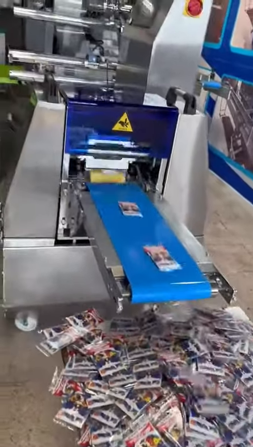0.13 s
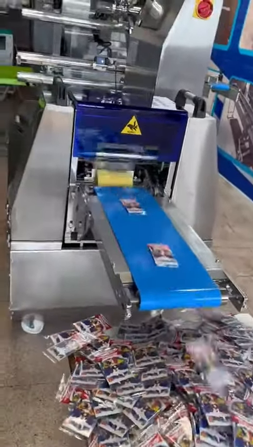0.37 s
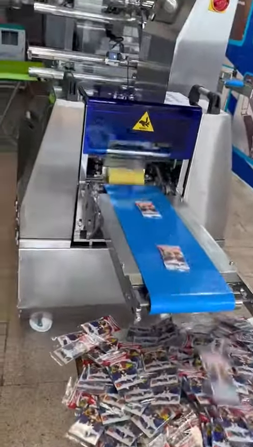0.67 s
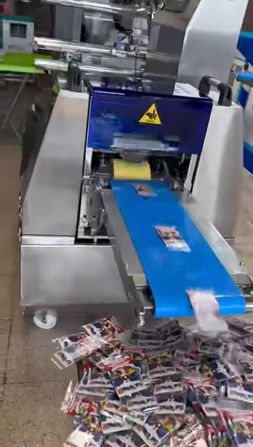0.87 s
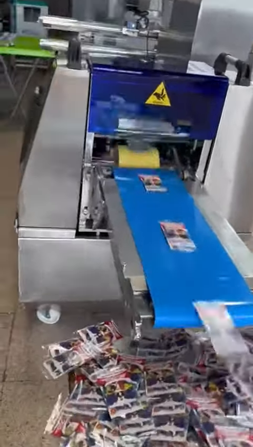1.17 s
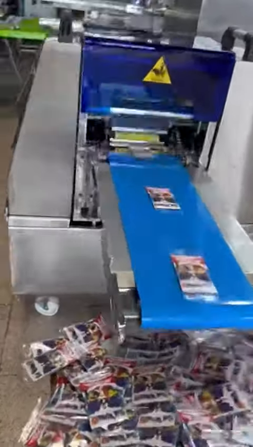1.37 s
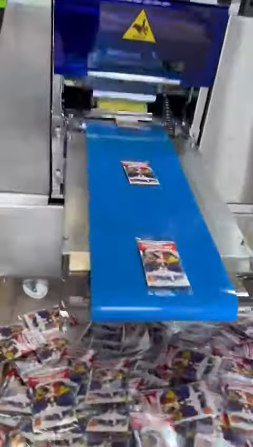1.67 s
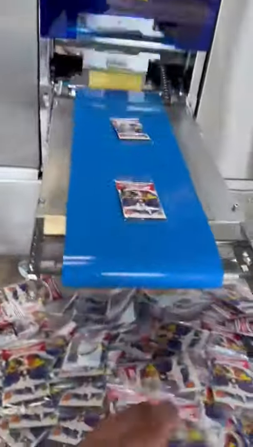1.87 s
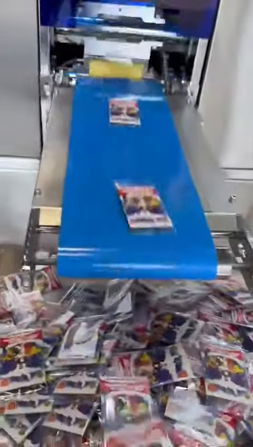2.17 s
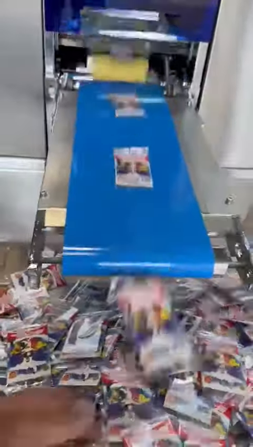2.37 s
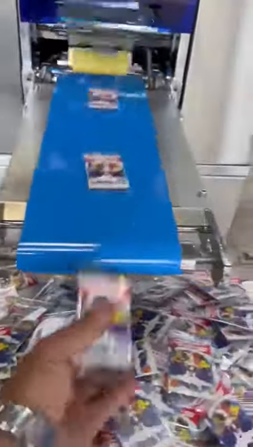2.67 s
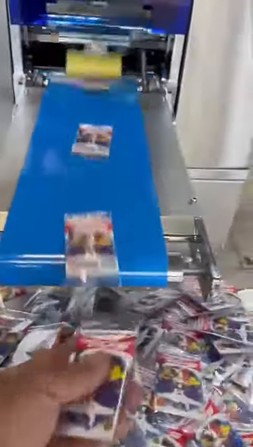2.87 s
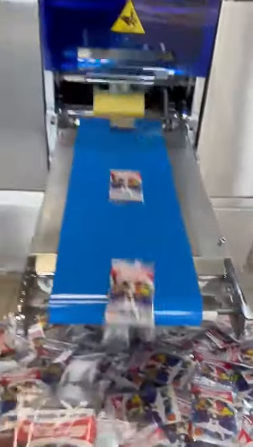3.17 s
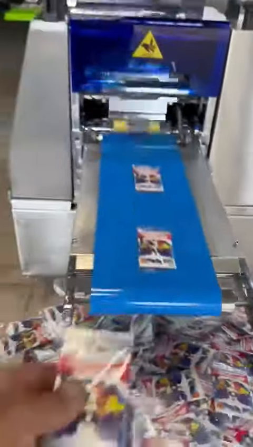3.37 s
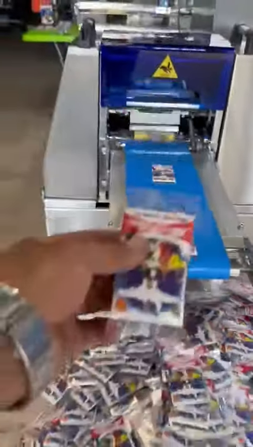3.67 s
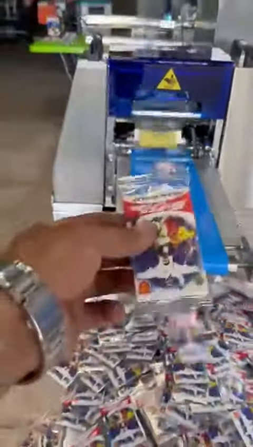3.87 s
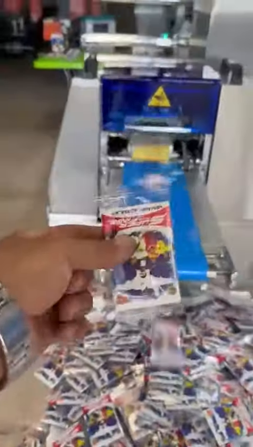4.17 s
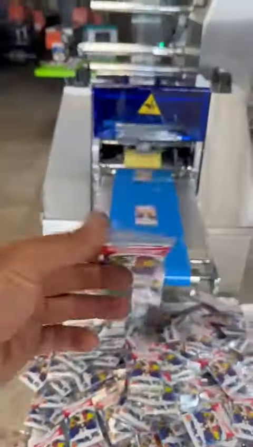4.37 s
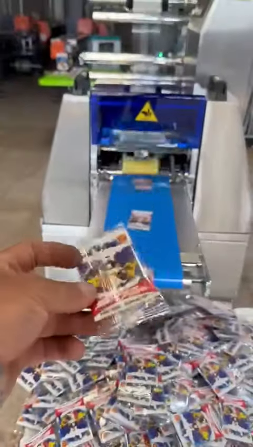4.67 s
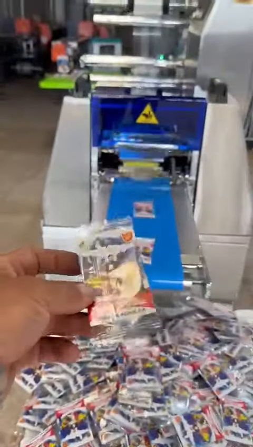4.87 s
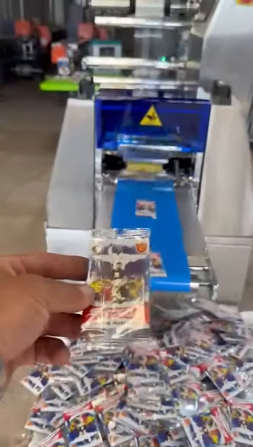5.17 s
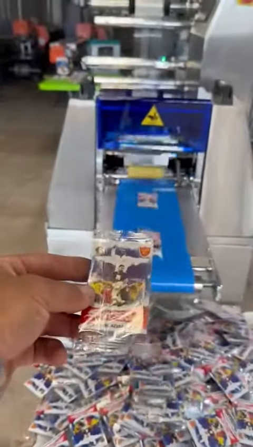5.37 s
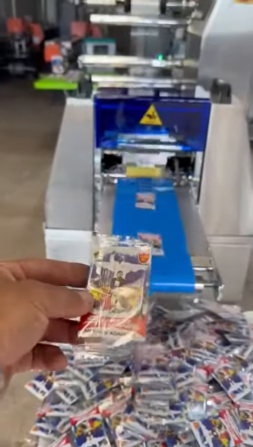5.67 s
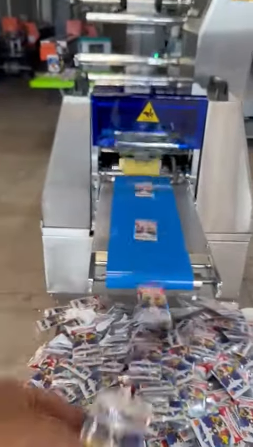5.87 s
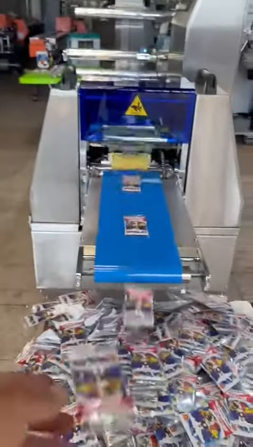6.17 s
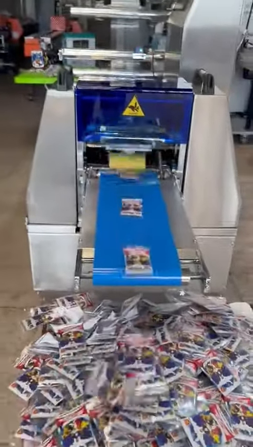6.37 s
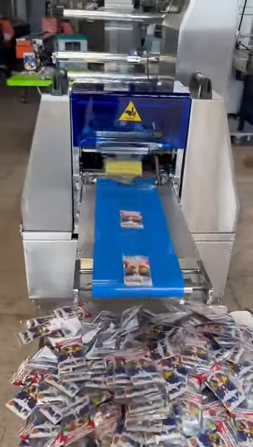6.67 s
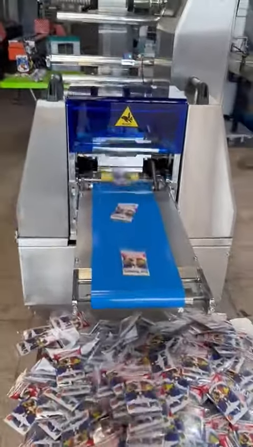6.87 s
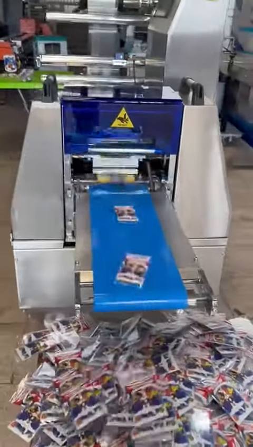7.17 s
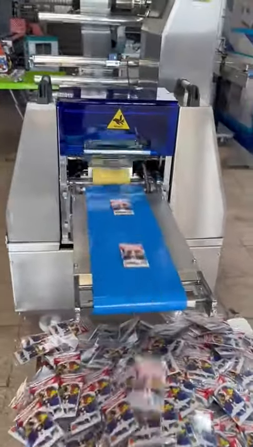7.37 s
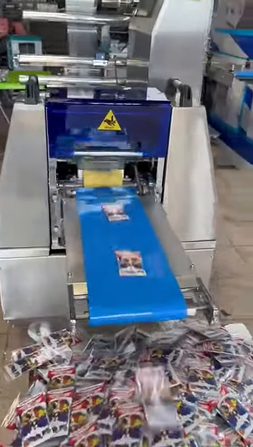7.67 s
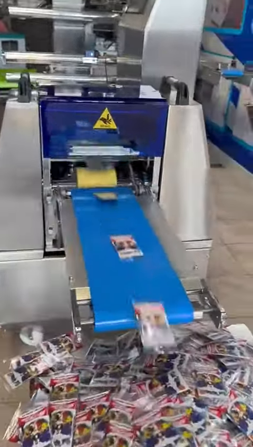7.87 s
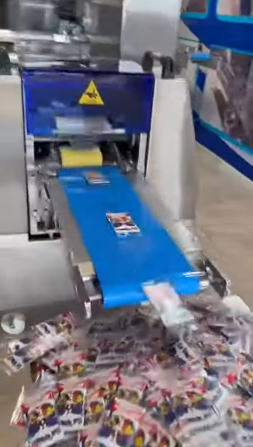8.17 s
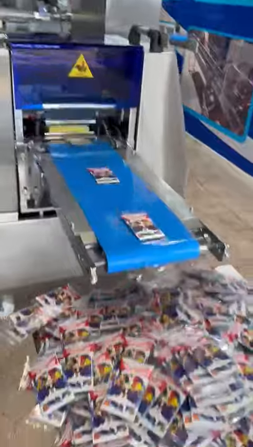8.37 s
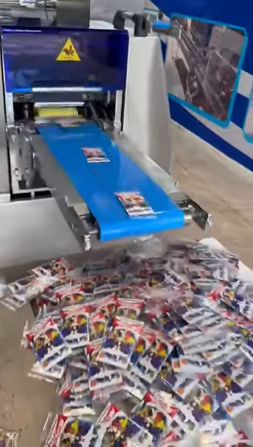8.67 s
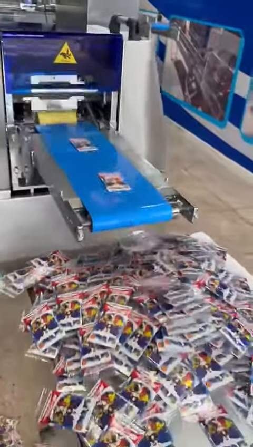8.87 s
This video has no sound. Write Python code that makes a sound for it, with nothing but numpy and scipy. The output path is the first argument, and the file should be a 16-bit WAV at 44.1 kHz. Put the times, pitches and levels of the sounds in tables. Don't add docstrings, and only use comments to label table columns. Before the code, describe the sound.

A packaging machine rumbles and hums steadily, crimping, knocking and puffing air several times a second while finished film packs snap and rustle onto a pile.

```python
import sys
import numpy as np
from scipy import signal
from scipy.fft import rfft, irfft, next_fast_len
from scipy.io import wavfile
from scipy.ndimage import uniform_filter1d

SR = 44100
rng = np.random.default_rng(int(sys.argv[2]) if len(sys.argv) > 2 else 0)


def put_to_file(sound):
    columns = np.atleast_2d(sound).T
    safe = np.clip(columns, -1, 1)
    whole_steps = np.round(safe * 32767)
    wavfile.write(sys.argv[1], SR, whole_steps.astype(np.int16))


def elevation(decibels):
    levels = np.asarray(decibels, float)
    return 10 ** (levels / 20)


N = 398223
PACK_S, PACK_COUNT = 0.29165, 31
CRIMP, LATCH, KNOCK, PUFF, THUD = range(5)


def evened(x):
    return x / np.sqrt(np.mean(x ** 2) + 1e-20)


def read(points, hz):
    f, value = np.transpose(points)
    return np.interp(np.log(hz + 1), np.log(f + 1), value)


def colour(x, points):
    size = next_fast_len(len(x))
    gain = elevation(read(points, np.fft.rfftfreq(size, 1 / SR)))
    return irfft(rfft(x, size) * gain, size)[:len(x)]


def body(x, modes):
    size = next_fast_len(len(x) + SR // 2)
    f = np.fft.rfftfreq(size, 1 / SR)
    response = 0
    for k, (hz, width, db) in enumerate(modes):
        damping = 1j * f * width
        response = response + (-1) ** k * elevation(db) * damping / (hz ** 2 - f ** 2 + damping)
    return irfft(rfft(x, size) * response, size)[:len(x)]


def phone(column):
    # start_s, nearness_db, left_right_db
    drift = [
        (0.0, 0.5, .5),
        (1.2, 0.54, 0.25),
        (2.1, 1, 0.5),
        (3.2, 0.05, 0.45),
        (4.2, 0.1, .7),
        (5.2, -0.34, .6),
        (6.3, -0.17, .8),
        (7.4, 0, .4),
        (8.3, 0, 0.55),
        (9.03, -1, .5),
    ]
    rows = np.array(drift)
    return np.interp(np.arange(N) / SR, rows[:, 0], rows[:, column])


def running(level_db, near, swing_db, top_s, drift_db):
    t = np.arange(N) / SR
    hz, phase = np.geomspace(0.6, 9, 24), rng.random(24)
    swells = np.sin(2 * np.pi * (t[::100, None] * hz + phase)) @ hz ** -0.25
    drift = evened(swells.repeat(100)[:N])
    load = swing_db * np.cos(2 * np.pi * (t - top_s) / PACK_S)
    return elevation(level_db + near * phone(column=1) + load + drift_db * drift)


def patchy(patchy_db, flicker_db):
    a, b, patches = rng.standard_normal((N // 128 + 5, 257, 3)).T
    patches = uniform_filter1d(patches, size=6, axis=0)
    patches = evened(uniform_filter1d(patches, size=20, axis=1))
    flicker = evened(uniform_filter1d(rng.standard_normal(a.shape[1]), size=6))
    z = (a + 1j * b) * elevation(patchy_db * patches + flicker_db * flicker)
    return signal.istft(z, nperseg=512, noverlap=384)[1][:N]


def frame():
    # pitch_hz, width_hz, level_db
    panels = [(50.4, 7.2, -13), (85.4, 16.5, -9.5), (109, 24, -9.5), (130.6, 13, -10.5), (146.2, 9, -6.5),
              (175, 18.3, -1), (185.5, 27, -2), (212.9, 4.6, -7), (233.3, 4.6, -0.5), (264.7, 10.7, -3.5),
              (307.4, 6, -0.5), (320.1, 9.7, -1.5), (337.5, 5.3, -0.5), (367, 17, -7.5), (391.2, 17, -9),
              (457.6, 23.6, -10.5), (513.8, 15, -11), (587.5, 24.5, -16), (700.5, 21.6, -14.5),
              (796, 15.7, -15.5), (1137, 11, -22), (2680, 36, -28)]
    turn = round(2 * PACK_S * SR)
    teeth = np.resize(rng.standard_normal(turn) * (rng.random(turn) < 150 / SR), N)
    rattle = rng.standard_normal(N) * (0.084 + (rng.random(N) < 600 / SR))
    rumble = evened(body(0.5 * evened(teeth) + evened(rattle), panels))
    return running(level_db=-24, near=2.2, swing_db=1.26, top_s=0.24, drift_db=1.48) * rumble


def steady():
    # pitch_hz, density_db
    belts = [(35, -36), (50, -7.5), (300, -2.5), (500, -2), (800, -3.5), (1100, -7), (1500, -8.5),
             (1870, -8.5), (2100, -8.5), (2600, -7), (3100, -11), (4300, -15), (5200, -10.5), (7000, -87)]
    # pitch_hz, density_db
    film = [(3500, -19), (4800, -27.5), (5700, 3), (6500, 2), (7500, -1.5), (8800, -6.5), (9600, -11.5),
            (10300, -20.5), (11300, -32), (13000, -60.5)]
    rubbing = patchy(patchy_db=1.36, flicker_db=0.66)
    whirr = evened(colour(rubbing, belts))
    whirr = running(level_db=-27, near=0.44, swing_db=0.42, top_s=0.23, drift_db=0.65) * whirr
    hiss = evened(colour(rubbing, film))
    hiss = running(level_db=-38, near=1, swing_db=0.37, top_s=0.21, drift_db=0.1) * hiss
    return whirr + hiss + frame()


def gears():
    # turns_per_pack, level_db
    orders = [(20, -51.5), (45, -32), (65, -32.5), (68, -45.5), (73, -41.5), (87, -30), (89, -45.5),
              (94, -36.5)]
    # time_s, level_db
    mesh_load = [(0.0, -29), (0.2, -25.5), (0.4, -42), (0.98, -28.5), (1.5, -37), (2.6, -33.5), (3.1, -39),
                 (3.3, -28), (4.05, -33), (4.83, -28), (5.08, -35), (5.41, -27), (5.7, -34.5), (6.4, -28),
                 (6.7, -37.5), (7.67, -28.5), (8.6, -35), (8.9, -31.5)]
    t = np.arange(N) / SR
    turns = 2 * np.pi * t / PACK_S
    tones = sum(elevation(db - 2.5) * np.sin(k * turns + 2 * np.pi * rng.random()) for k, db in orders)
    mesh = (0.2 + np.cos(turns + 0.1)) * np.sin(30 * turns)
    return tones + elevation(np.interp(t, *np.transpose(mesh_load)) + 4.0) * mesh


def servo():
    # time_s, pitch_hz, level_db
    drive = [
        (0, 319, -32.5),
        (0.198, 326, -33.5),
        (.3, 310.4, -35),
        (0.359, 293, -24),
        (.44, 301, -29),
        (.49, 340.2, -26.5),
        (.54, 325, -19.5),
        (0.5844, 324, -29.5),
    ]
    s, hz, db = np.transpose(drive)
    at = np.arange(N) / SR % (2 * PACK_S)
    waver = evened(uniform_filter1d(rng.standard_normal((N, 2)), size=3000, axis=0)).T
    turns = np.cumsum(np.interp(at, s, hz) + 2.565 * waver[0]) / SR
    return elevation(np.interp(at, s, db) + 1.2 * waver[1]) * np.sin(2 * np.pi * turns)


def blows(column, after_s, every=1):
    # crimp_db, latch_db, cam_knock_db, air_puff_db, jaw_thud_db
    lugs = [
        (-32, -32.5, -21.5, -39, -25.5),
        (-27, -40, -14.5, -39.5, -26),
        (-25.5, -31.5, -20, -40, -16.5),
        (-27, -40, -15.5, -41.5, -26),
        (-28, -31.5, -20, -38.5, -31),
        (-25.5, -40, -17.5, -40, -20.5),
    ]
    uneven = [
        0,
        2.5,
        0,
        0,
        4.0,
    ]
    # start_s, cam_knock_db, air_puff_db
    packs = [(0.0, -2, 0), (0.292, -1, -0.5), (0.583, 1, -6), (0.875, 0, -6.5), (1.167, 0, 0),
             (1.458, -6, 1), (1.75, 3, -1.5), (2.042, 3, -1), (2.333, 3, -1.5), (2.625, -1.5, 2),
             (2.917, 2.5, -0.5), (3.208, 0.5, 0), (3.5, 4, -7.5), (3.791, -0.5, -4.5), (4.083, -9, 1.5),
             (4.375, -10, 5.5), (4.666, 1, -1), (4.958, 4, 1), (5.25, 3, 0.5), (5.541, 4, 0),
             (5.833, 2, 5.5), (6.125, 4.5, 2.5), (6.416, -1, 2.5), (6.708, 0, 0.5), (7.0, 2.5, 3),
             (7.291, -8, -2.5), (7.583, 0, 1.5), (7.875, -12, 1.5), (8.166, 1.5, -0.5), (8.458, -9, -4)]
    bites = [3, 0.5, -1.5, -2.5, -3, -0.5, -3, 0, 1, 0.5, 3, -4, -4, 3, 3.5, 1, -6, 2, 2, 3, -2.5, 1.5, 3,
             0, 1, 0.5, 2, 3, 3.5, 0]
    out, pack = np.zeros(N + SR), np.arange(PACK_COUNT)
    own = np.zeros((PACK_COUNT, 5))
    own[:len(packs), KNOCK:PUFF + 1] = np.array(packs)[:, 1:]
    own[:len(bites), CRIMP] = bites
    chance = uneven[column] * rng.standard_normal(PACK_COUNT)
    db = np.array(lugs)[pack % len(lugs), column] + own[:, column] + chance
    at = np.clip(((pack * PACK_S + after_s) * SR).astype(int), 0, N)[::every]
    np.add.at(out, at, elevation(db[::every] + phone(column=1)[np.minimum(at, N - 1)]))
    return out[:N]


def burst(train, rise_s, t60):
    t = np.arange(SR // 4) / SR
    return signal.oaconvolve(train, np.minimum(t / rise_s, 1) * elevation(-60 * t / t60))[:N]


def ring(hz, t60, rise_s):
    t = np.arange(SR // 4) / SR
    return np.sin(2 * np.pi * hz * t) * np.minimum(t / rise_s, 1) * elevation(-60 * t / t60)


def jaws():
    # pitch_hz, width_hz, level_db
    bite_modes = [(1170, 230, -4), (1908, 116, 1), (2260, 140, 1), (2676, 174, 1), (3130, 400, -5.5),
                  (3780, 370, -6.5), (5620, 280, -7)]
    grit = rng.standard_normal(N) * (0.44 + (rng.random(N) < 1500 / SR))
    rasp = evened(body(grit, bite_modes))
    crimp = elevation(1.5) * rasp * burst(blows(CRIMP, after_s=-0.012), rise_s=0.012, t60=0.25)
    thud = elevation(-4) * signal.oaconvolve(blows(THUD, after_s=0.274), ring(162, 0.06, 0.003))[:N]
    trip = elevation(4.5) * ring(1800, 0.074, 0.00026)
    first = signal.oaconvolve(blows(LATCH, after_s=0.136, every=2), trip)[:N]
    fall_back = elevation(4.0) * ring(1184, 0.029, 0.001) + elevation(3.5) * ring(980, 0.051, 0.00061)
    second = signal.oaconvolve(blows(LATCH, after_s=0.157, every=2), fall_back)[:N]
    return crimp + thud + first + second


def cam():
    knock = elevation(1.5) * ring(335.7, 0.12, 0.0046)
    knock += elevation(-9) * ring(880, 0.03, 0.0018)
    knock += elevation(-10.5) * ring(400, 0.068, 0.0038)
    lower = elevation(2.0) * ring(235, 0.26, 0.029)
    lower += elevation(-11) * ring(580, 0.05, 0.0035)
    lower += elevation(3.0) * ring(260, 0.15, 0.009)
    strike = blows(KNOCK, after_s=0.184)
    bounce = elevation(-5.5) * np.roll(strike, round(0.055 * SR))
    both = signal.oaconvolve(strike - bounce, knock)
    return (both + signal.oaconvolve(blows(KNOCK, after_s=0.19, every=2), lower))[:N]


def valve():
    # pitch_hz, width_hz, level_db
    nozzle = [(5800, 170, -2), (6370, 240, 3.5), (7060, 330, 1.5), (7980, 700, -1.5), (8980, 380, -3),
              (9640, 400, -6.5)]
    jet = elevation(5.0) * evened(body(rng.standard_normal(N), nozzle))
    return jet * burst(blows(PUFF, after_s=0.198), rise_s=0.0054, t60=0.24)


def crackles():
    # start_s, peak_db, pitch_hz, brightness_db
    snaps = [(0.6974, -21.5, 6300, -37), (1.0064, -40, 6700, -39.5), (1.6362, -24, 6260, -29),
             (1.828, -25, 5960, -30), (1.9058, -17.5, 7160, -31), (2.808, -18, 6336, -31.5),
             (3.2774, -31, 6700, -25.5), (3.4294, -25, 6700, -24), (3.7084, -24, 6380, -40),
             (3.7807, -14.5, 5750, -86), (4.08, -26, 6100, -30), (4.153, -14, 6300, -42.5),
             (4.1965, -12.5, 6008, -38), (4.3736, -16.5, 5960, -47), (4.5754, -28, 9130, -8.5),
             (6.0107, -27, 7600, -30.5), (6.0365, -14, 5670, -34), (6.502, -20, 5900, -37),
             (6.557, -33, 6700, -35), (6.6294, -29, 6360, -18), (7.0324, -32, 6630, -33),
             (7.204, -23.5, 6330, -16.5), (7.5607, -23, 7140, -42.5), (8.063, -15, 7100, -41),
             (8.3154, -28.5, 6600, -28.5), (8.37, -23, 5780, -18), (8.5773, -23, 6370, -39.5)]
    out = np.zeros(N + SR)
    fizz = evened(body(rng.standard_normal(SR // 4), [(10200, 2200, 0)]))
    fizz = fizz * elevation(-60 * np.arange(SR // 4) / SR / 0.094)
    for s, db, hz, bright_db in snaps:
        snap = ring(hz, 0.0095, 0.00016) + 0.68 * ring(1.3 * hz, 0.0045, 0.00019)
        snap = elevation(db - 6.0) * (snap + elevation(bright_db + 10.0) * fizz)
        out[round(s * SR):][:len(snap)] += snap
    return out[:N]


def rustles():
    # start_s, length_s, level_db, pitch_hz
    crumples = [
        (1.0, .15, -48.5, 6700),
        (2.656, .35, -40.5, 6516),
        (4.079, 0.14, -36, 6100),
        (4.361, 0.09, -43.5, 5970),
        (6.061, .25, -40, 5580),
        (7.759, .1, -43.5, 6960),
        (8.05, 0.072, -44, 6750),
    ]
    out = np.zeros(N + SR)
    for s, length, db, hz in crumples:
        size, when = rng.exponential(1, SR), rng.random(SR)
        t = np.arange(round(length * SR)) / SR
        snaps = (elevation(4.3 * np.minimum(size, 5)) * (when < 1500 / SR))[:len(t)]
        sound = evened(body(snaps, [(hz, 700, 0), (1.35 * hz, 1500, -5)]))
        out[round(s * SR):][:len(t)] += elevation(db) * np.sin(np.pi * t / length) ** 0.6 * sound
    return out[:N]


def shop(x, start):
    # pitch_hz, t60_s
    decay = [(100, 0.67), (1000, 0.72), (4000, 0.7), (10000, 0.096)]
    taps = np.zeros(SR // 2)
    at = np.arange(start, SR // 2 - 20, 20)
    taps[at + rng.integers(0, 20, len(at))] = rng.choice([-1., 1.], len(at))
    hz, t, z = signal.stft(taps, SR, nperseg=256)
    tail = signal.istft(z * elevation(-60 * t / read(decay, hz)[:, None]), SR, nperseg=256)[1]
    return signal.fftconvolve(x, tail / np.linalg.norm(tail))[:N]


def scene():
    # pitch_hz, level_db
    wide = [(60, -36), (200, -28), (330, -23), (720, -8.5), (1150, -8.5), (1700, -18.5), (2700, -7.5),
            (4000, 0.5), (5500, -1.5), (6400, -29), (7500, -8.5), (8600, -2), (9800, 4), (11300, 13.5)]
    hits = jaws() + cam() + valve() + crackles() + rustles()
    centre = hits + elevation(-4.5) * shop(hits, start=300) + steady() + gears() + servo()
    around = 0.74 * shop(hits, start=40) + 0.5 * np.roll(hits, 90) + 0.92 * steady()
    width = colour(around, wide)
    lows = colour(centre, [(60, -20), (150, 3), (900, 3), (1500, -30)])
    lean = lows * np.tanh(phone(column=2) * np.log(10) / 40)
    return np.array([centre + width + lean, centre - width - lean])


def thinned(pair, scatter_db, quiet_db):
    # pitch_hz, level_db
    mask = [(100, -27), (400, -23), (1600, -16.5), (3000, -12), (4300, -8), (5000, -5), (5800, -10),
            (7000, -10), (8200, -6.5), (9500, -3), (11500, -1)]
    hz, _, z = signal.stft(pair, SR, nperseg=2048, noverlap=1536)
    power = abs(z) ** 2
    band = uniform_filter1d(uniform_filter1d(power, size=9, axis=1), size=2, axis=2)
    around = uniform_filter1d(band.max(0), size=90, axis=0)
    moods = rng.standard_normal((2, 65, z.shape[2] // 2 + 1)).repeat(16, 1).repeat(2, 2)
    moods = moods[:, :1025, :z.shape[2]]
    limit = around * elevation(2 * read(mask, hz))[:, None] + elevation(2 * quiet_db)
    limit = limit * elevation(2 * scatter_db * moods)
    weak = power < 0.45 * limit
    return signal.istft(z * (band > limit) * ~weak, SR, nperseg=2048, noverlap=1536)[1][:, :N]


def band_limit(x):
    return signal.sosfilt(signal.butter(12, 11600, fs=SR, output="sos"), x)


def record(dry):
    dry = dry * np.clip(0.73 + np.arange(N) / SR / 0.051, 0, 1)
    centre, width = dry.mean(0), (dry[0] - dry[1]) / 2
    notch = signal.butter(1, [4650, 5300], "band", fs=SR)
    centre = centre - 0.72 * signal.filtfilt(*notch, centre)
    centre, width = thinned(np.array([centre, width]), scatter_db=3.3, quiet_db=-87)
    return band_limit(np.array([centre + width, centre - width]))


dry = scene()
out = record(dry)
put_to_file(out)
```